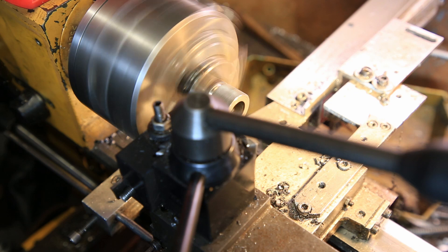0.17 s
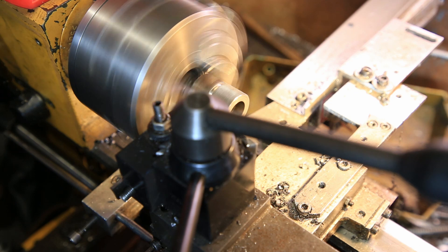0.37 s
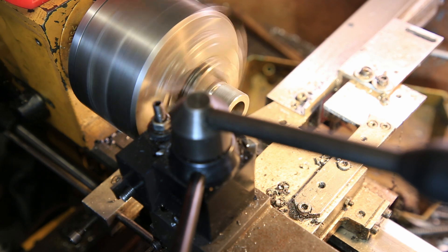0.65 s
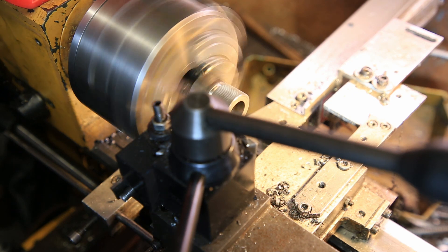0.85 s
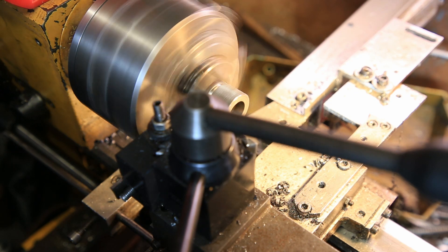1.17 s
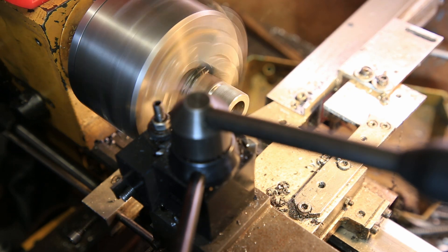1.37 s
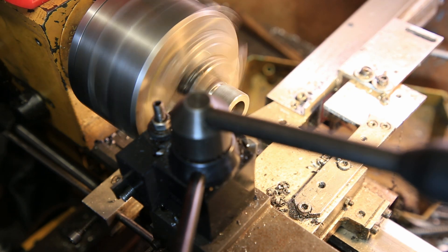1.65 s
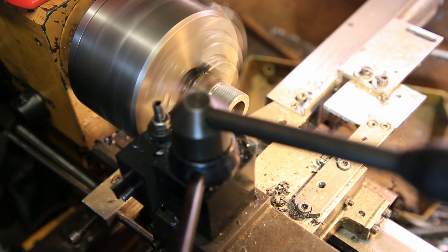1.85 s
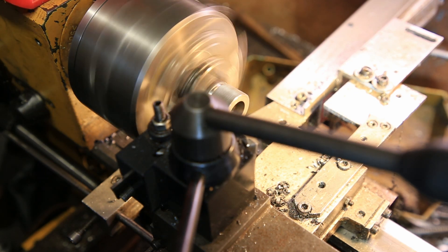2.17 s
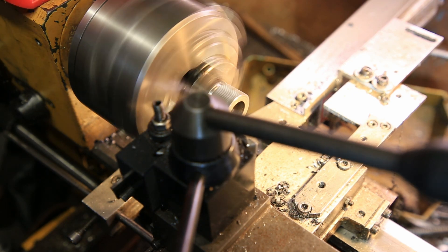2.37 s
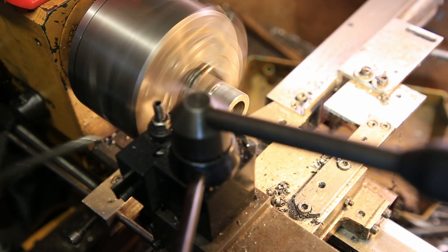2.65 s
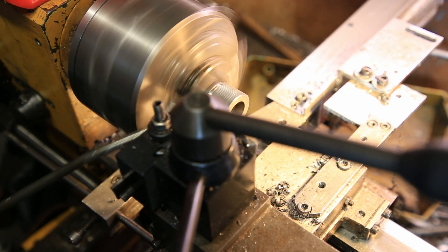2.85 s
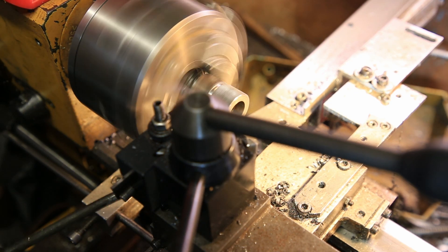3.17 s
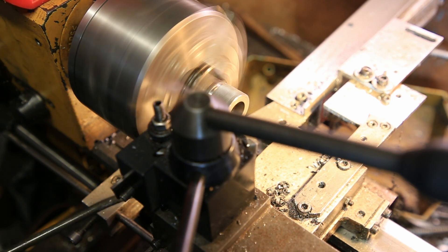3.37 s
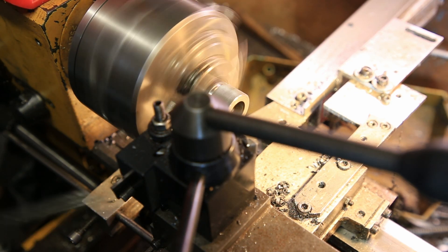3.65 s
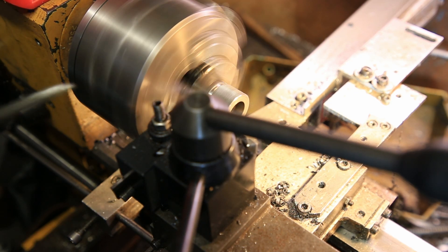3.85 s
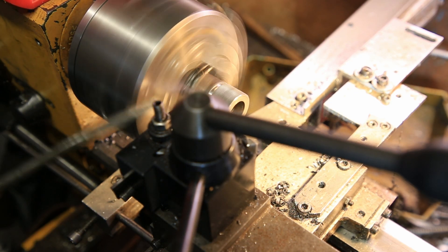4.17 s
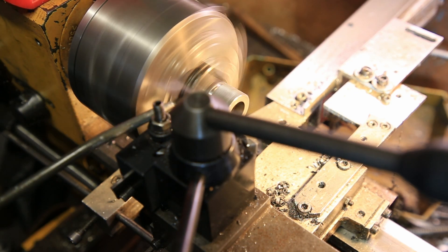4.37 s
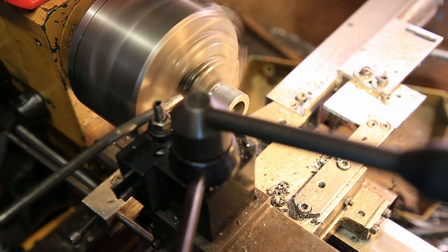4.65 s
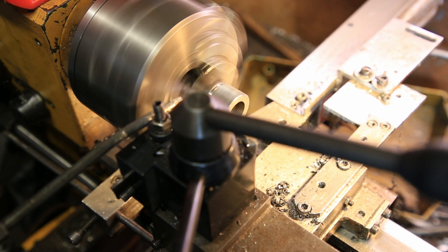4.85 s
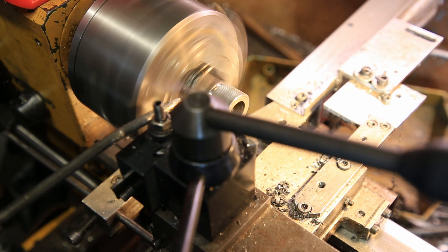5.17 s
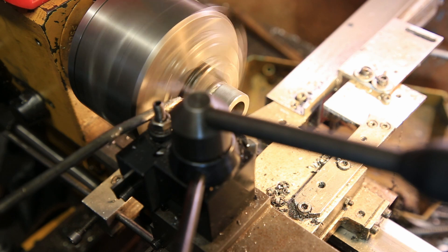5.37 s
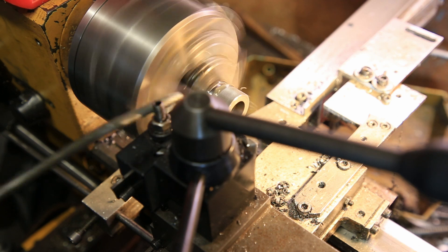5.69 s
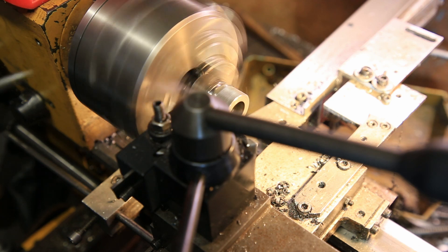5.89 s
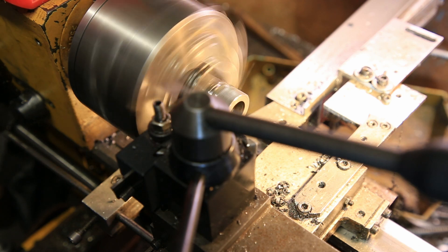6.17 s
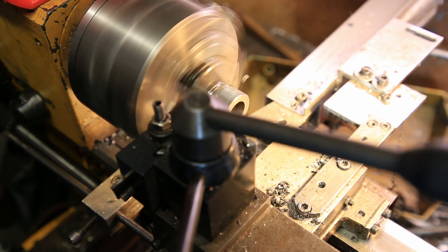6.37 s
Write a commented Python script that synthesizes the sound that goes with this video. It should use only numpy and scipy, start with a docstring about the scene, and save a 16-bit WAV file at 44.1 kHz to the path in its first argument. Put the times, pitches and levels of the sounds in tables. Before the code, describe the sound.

A metal lathe tool bites into spinning steel with a wavering mid-pitched ringing chatter, fades out and returns, with sharp steel clicks over machine whirr.

```python
"""Turning a steel bush on a metal lathe

In a small workshop the tool bites and chatters near 380 Hz: a near-sine swing plus overtones from its
blows, wavering and throbbing. The chip tears off as gritty noise through resonances of post, slide and bit.
The cut runs out, then bites again. Steel clicks on the tool post as decaying modes when a rod is brought
up to it; underneath, the drive whirrs as filtered noise with a faint sweeping squeak.
"""
import sys
import numpy as np
from scipy import signal
from scipy.fft import rfft, irfft, next_fast_len
from scipy.io import wavfile

SR = 44100
rng = np.random.default_rng(int(sys.argv[2]) if len(sys.argv) > 2 else 0)


def dump(signal):
    """Clip the signal to [-1, 1] and save it as 16-bit WAV at the path in sys.argv[1]."""
    limited = np.clip(np.atleast_2d(signal).T, -1, 1)
    pcm = np.round(limited * 32767).astype(np.int16)
    wavfile.write(sys.argv[1], SR, pcm)


N = 287538

# unsteadiness of the chatter: t/s, roughness/0-1
ROUGHNESS = [(0, .8), (.5, .5), (.7, .25), (1.05, .25), (1.2, .5), (2, .55), (3.5, .6), (4.3, .9), (6.1, 1),
             (6.35, .4), (6.52, .4)]
SHAFT_HZ = 23.5   # turns of the motor shaft per second


def from_db(db):
    """Level to amplitude: 20 dB is a factor of ten."""
    return 10 ** (np.asarray(db) / 20)


def rms_one(x):
    """Normalisation to unit mean power."""
    return x / np.sqrt(np.mean(x ** 2) + 1e-20)


def in_time(rows):
    """Linear interpolation: each column of a time curve at every sample."""
    s, *columns = np.transpose(rows)
    return [np.interp(np.arange(N) / SR, s, c) for c in columns]


def drift(rate):
    """Low-passed random fluctuation: noise through two equal poles at rate Hz, rms 1."""
    r = np.exp(-40 * np.pi * rate / SR)   # computed at every 20th sample
    noise = rng.standard_normal(N // 20 + 4002)
    slow = signal.lfilter([1], [1, -2 * r, r * r], noise)[4000:]   # drop the settling time
    return np.interp(np.arange(N) / 20, np.arange(len(slow)), rms_one(slow))


def colour(x, spectrum):
    """Spectral shaping: a steady sound takes a level curve over log frequency; rms 1."""
    hz, db = np.transpose(spectrum)
    size = next_fast_len(N)
    bins = np.maximum(np.fft.rfftfreq(size, 1 / SR), 1)
    gain = from_db(np.interp(np.log(bins), np.log(hz), db))
    gain = gain * np.minimum(bins / hz[0], 1) ** 2   # falls away below the first frequency
    return rms_one(irfft(rfft(x, size) * gain, size)[:N])


def resonate(x, modes):
    """Forced resonance: a steady force drives parallel two-stage resonators, each at its own rms level."""
    out = 0
    for hz, width_hz, db in modes:
        r = np.exp(-np.pi * width_hz / SR)
        section = [1, 0, -1, 1, -2 * r * np.cos(2 * np.pi * hz / SR), r * r]
        out = out + from_db(db) * rms_one(signal.sosfilt([section, section], x))
    return out


def ring(force, hz, t60):
    """Free decay of a mode: a unit impulse starts a sine that falls 60 dB in t60 seconds."""
    r, w = from_db(-60 / (t60 * SR)), 2 * np.pi * hz / SR
    return signal.lfilter([0, np.sin(w)], [1, -2 * r * np.cos(w), r * r], force + 1e-18)


def chatter(phase, pitch_hz, swing_db, blow_db):
    """Self-excited vibration: a near-sine swing whose blows on the work add fluttering overtones."""
    # shape of the blows, relative to their level: t/s, second harmonic/dB,
    # fourth and higher, and half orders/dB
    blow_shape = [(0, -21, -10), (.5, -6, -12), (.7, -1.5, -1), (.88, 2, 2.5), (1.02, 5.5, 5),
                  (1.2, 3.5, -1.5), (1.32, -1, -1.5), (1.42, 2, -4.5), (1.55, 0, 0), (1.85, 1.5, -2),
                  (2.2, -3, -6.5), (2.6, 4.5, -3.5), (3.0, -1.5, -7), (3.6, 0.5, -14), (4.5, 0, -18),
                  (5.4, 2, -31), (6.2, -1, -18), (6.52, -8.5, -8)]
    # upper overtones, and half orders from alternately strong and weak blows: multiple, relative level/dB
    upper = [(.5, -25), (1.5, -11.5), (2.5, -16), (4, 1), (5, -0.5), (6, -8.5), (7, -9), (8, -13.5),
             (9, -20), (11, -13.5), (12, -21), (13, -19), (14, -19), (15, -17), (16, -13)]
    second_db, upper_db = in_time(blow_shape)
    rough, = in_time(ROUGHNESS)
    overtones = [(2, second_db), (3, 0.63)] + [(k, upper_db + db) for k, db in upper]
    grip = rough * drift(28)   # the edge catches and eases, moving all overtones together
    out = from_db(swing_db - 2.5 + 2.95 * grip) * np.sin(phase)
    for k, db in overtones:
        flutter = from_db(1.4 * grip + 2.6 * rough * drift(20))
        smear = .25 * rough * drift(30) + .5 * drift(2)   # wandering phase, radians
        level = from_db(blow_db + db + flare_db(k * pitch_hz) - 6.5) * flutter
        out += level * np.sin(k * phase + smear + rng.uniform(0, 2 * np.pi))
    return np.sqrt(2) * out


def flare_db(hz):
    """Resonant gain: an overtone flares as its wavering pitch crosses a resonance of the tool post."""
    # centre f/Hz, width/Hz, lift/dB
    flares = [(736.6, 29, 6.5), (1162, 43, 4.5), (1514, 20, 5), (1897, 36, 4), (2211, 63, 14.5),
              (2960, 36, 9)]
    lift = 0
    for centre, width, db in flares:
        if abs(hz.mean() - centre) < 150:
            lift = lift + db / (1 + (2 * (hz - centre) / width) ** 2)
    return lift


def pitch():
    """Frequency modulation: chatter wavers about its mean, bends with each turn and varies with the surface."""
    # chatter: t/s, mean f/Hz, depth of waver either way/Hz (below 0 counts as none)
    mean_pitch = [(0.0, 390.3, 7.5), (0.6, 383.6, -1.5), (0.95, 376.6, 0.8), (1.15, 374.5, 10.0),
                  (1.4, 376.9, 9), (1.65, 385.4, 8), (2.3, 379.9, 6.9), (3.1, 382, 9), (3.7, 385.3, 6),
                  (4.1, 381.1, 4), (6.52, 381.8, 5.5)]
    # t/s, wavers per second/Hz
    waver_rate = [(0.0, 4.92), (1.1, 6.99), (1.7, 5.75), (2.4, 5.9), (2.8, 7.49), (3.3, 7.42), (3.6, 7.96),
                  (4.6, 7.24), (5.2, 7.04), (6.5, 6.9)]
    runout_bend_hz, uneven_hz = 2.48, 2.0
    mean_hz, depth_hz = in_time(mean_pitch)
    waver = np.maximum(depth_hz, 0) * np.cos(2 * np.pi * cycles(waver_rate, 0))
    return mean_hz + waver + runout_bend_hz * runout() + uneven_hz * drift(11.9)


def load():
    """Amplitude modulation: the feed, rounded throbs with sharp dips, runout and jolts set three levels."""
    # feed into the work, relative levels: t/s, tool swing/dB, blows on the work/dB, tearing chip/dB,
    # throb depth/dB (below 0 counts as none)
    cut = [(0.0, -78, -79.7, -59.5, 0.1), (0.15, -52.5, -60, -50.5, 0.0), (0.38, -49, -72, -55, 6.1),
           (0.58, -34.5, -46, -49, 4.1), (0.75, -29, -35.5, -39, -1.5), (1.05, -28.1, -38.5, -33.5, 2.5),
           (1.35, -28.5, -31, -32, 1), (2.05, -31.0, -38, -37.4, 1), (2.95, -31.5, -39, -36.5, 1.5),
           (3.4, -34.5, -44, -42.5, 5.5), (4.2, -36.5, -51, -46, 3.5), (4.8, -39.5, -56.5, -48.5, 2.4),
           (5.38, -45.5, -67, -53.5, 19.5), (5.52, -67.8, -72, -59.5, 7), (5.95, -58.5, -62.5, -53.5, -1),
           (6.25, -39.5, -60, -49, 2), (6.46, -31.5, -32, -39.2, 22), (6.52, -36, -40, -38.8, 15)]
    # the load throbs: t/s, throbs per second/Hz
    throb_rate = [(0.0, 10.2), (1.0, 6.27), (1.65, 6.33), (2.0, 7.68), (2.7, 7.45), (3.05, 8.07),
                  (3.4, 7.18), (5.9, 6.97), (6.5, 7.94)]
    # the edge digs in or loses its grip for a moment: t/s, change of level/dB, half length to 1/e/s
    jolts = [(.325, 4, 0.016), (0.42, -5, .015), (.46, 5, 0.021), (0.726, 3, 0.015), (0.907, 0, 0.015),
             (1.1, -4, 0.023), (1.16, 2, .02), (2.0, -6, 0.017), (2.135, -6.5, 0.012), (2.465, 2, 0.0075),
             (3.32, -7.5, .02), (3.524, 3, 0.033), (4.23, 3.5, 0.027), (4.42, -0.5, 0.016),
             (4.685, -5, 0.022), (4.956, -8.5, 0.022), (6.2, 5.5, .03), (6.258, -7, 0.022)]
    first_throb_s, runout_share = .2385, 0.24   # runout as a share of the throb depth
    blows_follow, chip_follows = 1.5, 0.68   # dB for each dB of load in the swing
    blow_throb_db, uneven_db = 2, 2.5   # the blows' own throb, and their variation with the surface
    full_throb_roughness = .55   # clean chatter has about half of these two; they are full from here on
    swing_db, blow_db, chip_db, depth_db = in_time(cut)
    rough, = in_time(ROUGHNESS)
    t = np.arange(N) / SR
    throb = np.abs(np.cos(np.pi * cycles(throb_rate, first_throb_s))) - 2 / np.pi   # zero mean
    jolt_db = sum(db * np.exp(-((t - s) / half_s) ** 2) for s, db, half_s in jolts)
    load_db = np.maximum(depth_db, 0) * (throb + runout_share * runout()) + jolt_db
    unsteady = np.minimum(rough / full_throb_roughness, 1)
    blow_db = blow_db + blows_follow * load_db
    blow_db = blow_db + unsteady * (blow_throb_db * throb + uneven_db * drift(15))
    return swing_db + load_db, blow_db, chip_db + chip_follows * load_db


def cycles(rates, since_s):
    """Phase as the integral of frequency: cycles counted from a given moment."""
    rate, = in_time(rates)
    count = np.cumsum(rate) / SR
    return count - count[round(since_s * SR)]


def runout():
    """Eccentric rotation: work out of true gives one swell per turn."""
    spindle_hz, high_spot_s = 3.387, 0.0918
    return np.cos(2 * np.pi * spindle_hz * (np.arange(N) / SR - high_spot_s))


def chip(phase, chip_db):
    """Fracture noise: the tearing chip shakes tool post and slide and hisses over the face of the bit."""
    # relative to the chip: t/s, hiss and bit/dB, boom of the slide/dB
    chip_tone = [(0, 5, 7), (.5, 4.5, -7), (.8, 3.5, -17), (1.3, 1.5, -31), (2, 1.5, 3), (2.7, 0, 6),
                 (3.3, -1, 10), (4, 1, 9.5), (5, 1.5, 2.5), (5.5, 1.5, -2), (6, 4, 12.5), (6.52, 1.5, -1.5)]
    # spectra of tearing and of hiss on the tool face: f/Hz, relative density/dB
    tearing_spectrum = [(60, -45), (150, -32), (300, -4.5), (500, 0.5), (900, 1.5), (1500, 7.5),
                        (2000, 4.5), (2600, 0), (3400, -5), (5000, -19), (16000, -40)]
    hiss_spectrum = [(1500, -3), (2600, 1), (3400, 5), (4700, 1.5), (6100, 1), (6700, -3.5), (8600, -7),
                     (9200, -10), (10600, -13.5), (11800, -27), (16000, -42)]
    # resonances of tool post and slide, then the slide's boom: f/Hz, width/Hz, relative level/dB
    post_modes = [(183, 78, -21.5), (407, 88, -9), (557.6, 38, -15.5), (689.6, 55, -5), (725.6, 23, -10.5),
                  (846, 114, -9.5), (946, 44, -9.5), (1122, 78, -3), (1443, 125, -6), (1636, 49, -9.5),
                  (1807, 42, -15), (2205, 30, -10), (2517, 270, -5.5), (2957, 36, -13)]
    slide_modes = [(278, 27, -20.5)]
    hiss_db, boom_db = in_time(chip_tone)
    rough, = in_time(ROUGHNESS)
    tearing = from_db(-4.5) * colour(fractures(phase, depth=0.52, grain_db=0.5), tearing_spectrum)
    post = from_db(-5.5) * resonate(fractures(phase, depth=0.43, grain_db=4.5), post_modes)
    slide = from_db(boom_db) * resonate(rng.standard_normal(N), slide_modes)
    face = from_db(-10.0) * colour(fractures(phase, depth=0.29, grain_db=0.5), hiss_spectrum)
    singing = from_db(-13.0 + 0.43 * (chip_db + 27.5)) * bit(phase)   # stronger share under a heavy chip
    ragged = np.minimum(2 * rough, 1) ** 0.43   # steady chatter parts the chip more smoothly
    curling = from_db(1.13 * drift(19.4))   # the chip flows off unevenly
    body = ragged * (tearing + post + slide)
    return from_db(chip_db) * curling * (body + from_db(hiss_db) * (face + singing))


def fractures(phase, depth, grain_db):
    """Modulated noise: tiny breaks of uneven size, strongest in the part of each swing that digs in."""
    digging = np.maximum(1 + depth * np.cos(phase), 0)
    return rng.standard_normal(N) * digging * from_db(grain_db * drift(700))


def bit(phase):
    """Pulse and noise excitation: sharp blows and fractures ring the tool bit."""
    # resonances of the bit: f/Hz, width/Hz, relative level/dB
    bit_modes = [(4200, 300, -10), (5135, 110, -1), (5280, 110, -1), (5980, 300, -4), (6270, 150, -11),
                 (8270, 180, -15), (8600, 250, -16), (11350, 350, -25)]
    rough, = in_time(ROUGHNESS)
    pulses = sum(np.cos(k * phase) for k in range(9, 34))   # upper harmonics of a pulse train
    struck = from_db(2.0 * drift(25)) * resonate(pulses, bit_modes)
    scraped = resonate(fractures(phase, depth=0.24, grain_db=0.0), bit_modes)
    return (1 - rough) * struck + np.sqrt(rough) * scraped


def graze():
    """Friction tone: the edge squeaks roughly as it first grazes the work, a few harmonics of a gliding pitch."""
    # t/s, mean f/Hz, relative level/dB
    touches = [(.08, 509, -77), (.12, 533, -47), (.15, 571, -55), (.18, 607, -45), (.22, 609, -52),
               (.27, 570, -75)]
    hz, db = in_time(touches)
    t = np.arange(N) / SR
    phase = 2 * np.pi * np.cumsum(hz + 60 * drift(150)) / SR
    tone = sum(np.sin(k * phase) / k for k in (1, 2, 3))
    sounding = (t > touches[0][0]) * (t < touches[-1][0])
    return from_db(db + 2.0 * drift(60)) * tone * sounding


def clicks():
    """Impact excitation: a blow and short scrape ring the steel's modes; the bed scatters the crack."""
    # steel on steel: t/s, level/dB, treble lift/dB, decay time of the scrape/s, rod's ping relative to level/dB
    touches = [(3.044, -13.5, -4, 0.0029, -35), (3.0856, -13, -18, 0.007, -21),
               (3.095, -16, -11, 0.0047, -30), (3.1006, -35, -1, 0.0033, -30),
               (3.194, -21.5, -8, 0.0048, -33), (3.3896, -4.5, -2.5, 0.00037, -30),
               (3.4034, -16, 6, 0.0019, -25), (3.5405, -20, -5, .003, -33), (3.555, -29, 0, 0.0042, -23),
               (3.567, -29, 2, .003, -28), (3.579, -31, -16, 0.023, -25), (3.62, -30.5, -12, .04, -25),
               (3.7064, -24, -13, 0.0037, -30), (4.27, -42, 14, .002, -25), (4.8388, -27, 8, 0.0011, -17),
               (5.7027, -33.5, 13.5, 0.0017, -3), (5.7237, -25, -1, .001, -29),
               (5.762, -43, 12, 0.0038, -1), (5.77, -47, -2, .002, 9.5)]
    # nominal modes of the struck steel: f/Hz, relative level/dB, t60/s
    steel_modes = [(690, -10, 0.04), (860.8, -10, 0.044), (1370, -13, .03), (1950, -13, .03),
                   (2480, -5, 0.04), (3175, -10, 0.04), (3600, -1, 0.0079), (4310, -0.5, 0.051),
                   (5220, -7, 0.029), (6040, -7, 0.035), (6583, -9, 0.028), (7130, -5, 0.037),
                   (8900, -22, .025), (11550, -10, .015)]
    # crack: f/Hz, relative density/dB
    crack_spectrum = [(100, -63), (600, -3.5), (1500, -7), (2500, 1), (4200, 2.5), (7000, 1.5), (8200, -6),
                      (11500, -10.5), (13500, -24), (16000, -36)]
    rod_hz, rod_t60_s = 3164, 0.024
    t = np.arange(N // 20) / SR
    crack = colour(rng.standard_normal(N), crack_spectrum)
    ping = np.sin(2 * np.pi * rod_hz * t) * np.exp(-np.log(1000) * t / rod_t60_s)
    snap = np.sin(2 * np.pi * 5500 * t) * np.exp(-t / .0002)   # the direct first swing of the contact
    treble = signal.butter(1, 8000, "high", fs=SR, output="sos")
    out = np.zeros(N + len(t))
    for s, peak_db, bright_db, scrape_s, ping_db in touches:
        force = 0.14 * rng.standard_normal(len(t)) * np.exp(-t / scrape_s)
        force[0] = 1
        rings = 0
        for hz, db, t60 in steel_modes:
            # every contact point favours other modes and shifts them a little
            favour = from_db(db + rng.normal(0, 2))
            rings = rings + favour * ring(force, hz * rng.uniform(.96, 1.04), t60)
        dying = np.exp(-t / (0.0023 + scrape_s)) + from_db(-31) * np.exp(-t / 0.053)   # fast, then a faint tail
        start = rng.integers(N - len(t))
        hit = from_db(-9.0) * rings / np.abs(rings).max()
        hit = hit + from_db(-13.5) * crack[start:start + len(t)] * dying
        hit = hit + from_db(-11) * snap * np.exp(-scrape_s / 0.0024)   # long scrapes snap less
        bright = hit + (from_db(bright_db) - 1) * signal.sosfilt(treble, hit)
        at = round(s * SR)
        out[at:at + len(t)] += from_db(peak_db) * (bright + from_db(ping_db) * ping)
    # small parts radiate no bass
    return signal.sosfilt(signal.butter(2, 350, "high", fs=SR, output="sos"), out[:N])


def thuds():
    """High modal density: the bed's many low modes answer a heavier touch as quickly dying noise."""
    # knocks: t/s, relative level/dB
    knocks = [(3.089, -30.5), (3.397, -40)]
    # knock: f/Hz, relative density/dB
    bed_spectrum = [(80, -21), (140, -4), (260, -1), (500, -5), (900, 1.5), (1600, -18), (4000, -40)]
    t = np.arange(N) / SR
    level = sum(from_db(db) * (t > s) * np.exp(-np.abs(t - s) / 0.029) for s, db in knocks)
    return from_db(-4.0) * level * colour(rng.standard_normal(N), bed_spectrum)


def drive():
    """Rotating machinery noise: rush and gears pulse with the shaft, beside a squeak and a steady whistle."""
    # rush of the drive: f/Hz, relative density/dB
    rush_spectrum = [(25, -10), (70, -11), (130, -1.5), (300, -2.5), (520, 2), (1000, -6.5), (1700, 1),
                     (2500, -6), (3600, -8), (5000, -12), (8600, -10.5), (9400, -17), (10800, -23),
                     (12000, -25.5), (16000, -28)]
    # singing of motor, gears and bearings: f/Hz, width/Hz, relative level/dB
    gear_modes = [(50.6, 2.7, -78), (100.3, 2.8, -71), (188, 12, -79), (237.6, 12, -65.5),
                  (298, 170, -61.5), (674, 31, -81), (910, 94, -57.5), (1499, 44, -58.5), (3080, 120, -58)]
    # thin whistle of the motor: f/Hz, width/Hz, level/dB
    whistle_modes = [(9810, 50, -73), (10100, 65, -72.5), (10470, 99, -78), (9970, 600, -68.5)]
    rush_db = -54.5
    shaft = np.sin(2 * np.pi * SHAFT_HZ * np.arange(N) / SR + 0.4 * drift(3.5))
    rush = from_db(rush_db + 1.0 * shaft + 1.5 * drift(6.4)) * colour(rng.standard_normal(N), rush_spectrum)
    gears = from_db(-5.0 + 1.6 * shaft + 0.87 * drift(11)) * resonate(rng.standard_normal(N), gear_modes)
    whistle = resonate(rng.standard_normal(N), whistle_modes)
    return rush + gears + squeak() + whistle


def squeak():
    """Heterodyned noise: low-passed noise on a carrier swells and sweeps up once per turn of the shaft."""
    # t/s, mean level/dB
    squeak_level = [(0, -68.5), (4.2, -65.5), (5.5, -64), (5.9, -69), (6.52, -68)]
    from_hz, to_hz, width_hz = 7400, 8950, 840
    turn = (SHAFT_HZ * np.arange(N) / SR + .1 * drift(8)) % 1
    hz = from_hz + (to_hz - from_hz) * turn + 200 * drift(20)
    low_pass = signal.butter(2, width_hz / 2, fs=SR, output="sos")
    narrow = signal.sosfilt(low_pass, rng.standard_normal(N))
    carrier = np.sin(2 * np.pi * np.cumsum(hz) / SR)
    level_db, = in_time(squeak_level)
    return from_db(level_db + 2.0 * drift(8)) * rms_one(narrow * np.sin(np.pi * turn) * carrier)


def scene():
    """Superposition: the cut, the clicks and the running machine add up."""
    swing_db, blow_db, chip_db = load()
    rough, = in_time(ROUGHNESS)
    blow_db = np.minimum(blow_db, swing_db + 6)   # a tool at rest deals no blows
    pitch_hz = pitch()
    phase = 2 * np.pi * np.cumsum(pitch_hz + 3.0 * rough * drift(35)) / SR
    cutting = graze() + chatter(phase, pitch_hz, swing_db, blow_db) + chip(phase, chip_db)
    return (cutting + clicks() + thuds() + drive())[None]


def record(dry):
    """Band limiting: a steep elliptic low-pass removes the top."""
    cutoff_hz = 15850
    return signal.sosfilt(signal.ellip(10, .1, 80, cutoff_hz, fs=SR, output="sos"), dry)


dry = scene()
out = record(dry)
dump(out)
```